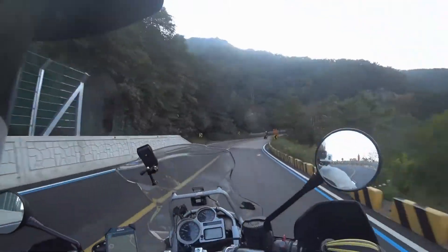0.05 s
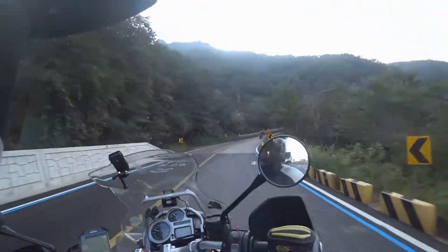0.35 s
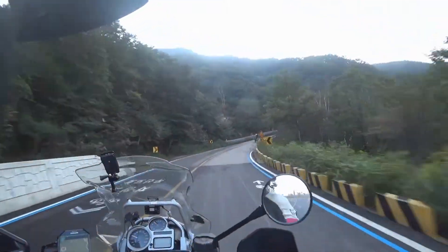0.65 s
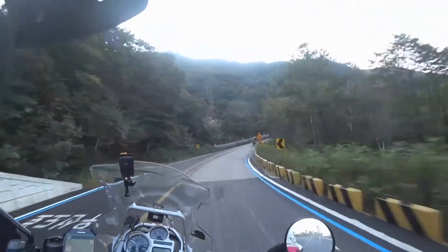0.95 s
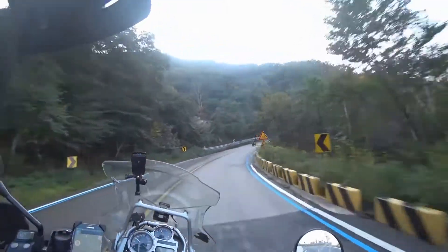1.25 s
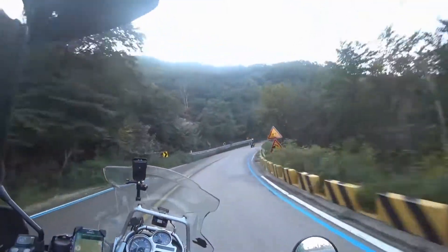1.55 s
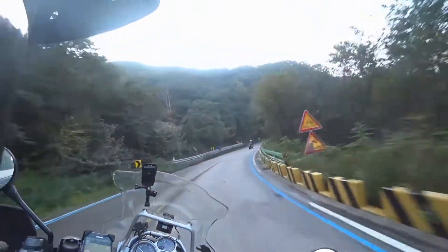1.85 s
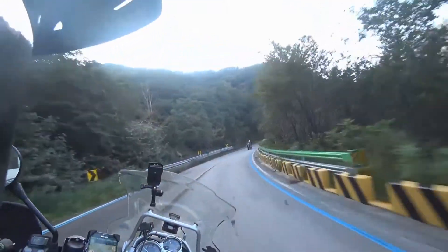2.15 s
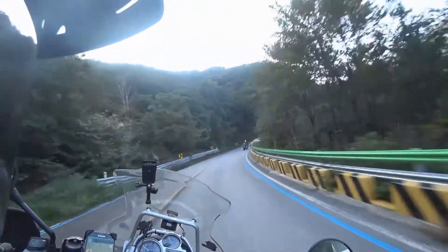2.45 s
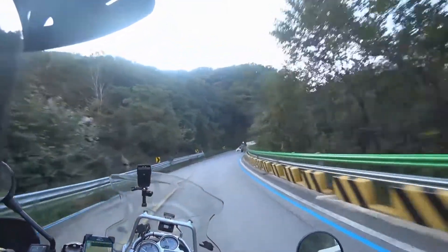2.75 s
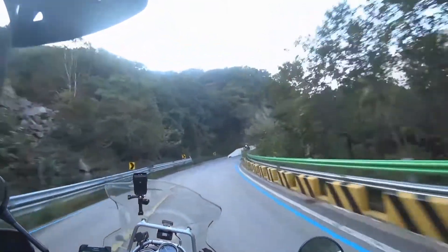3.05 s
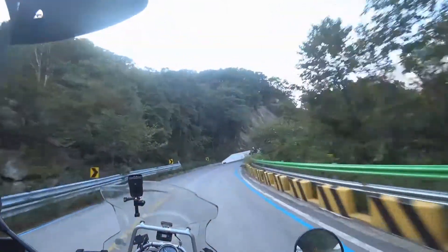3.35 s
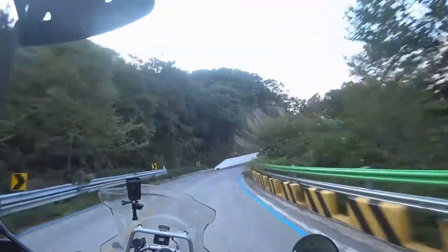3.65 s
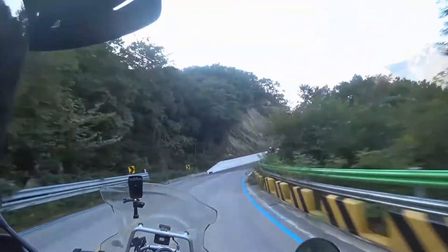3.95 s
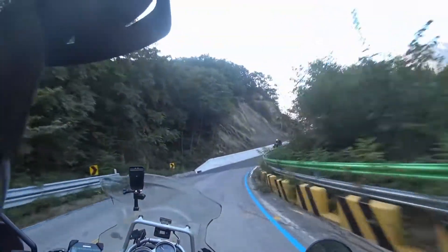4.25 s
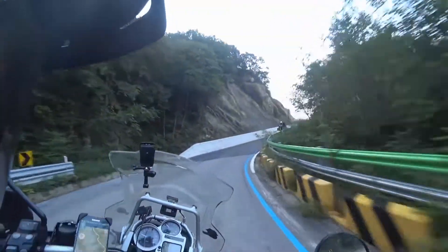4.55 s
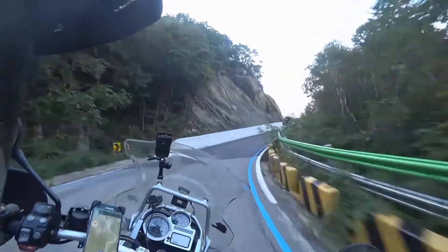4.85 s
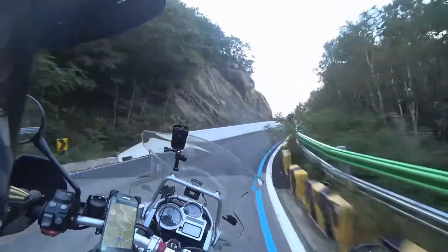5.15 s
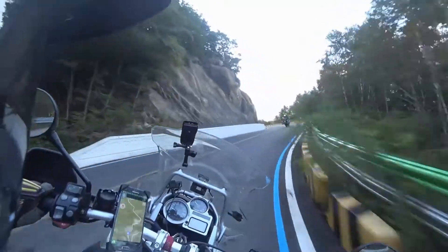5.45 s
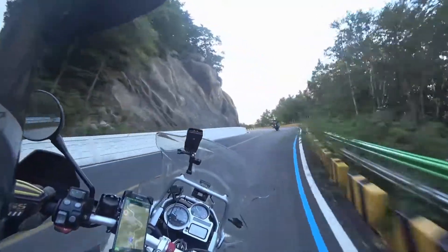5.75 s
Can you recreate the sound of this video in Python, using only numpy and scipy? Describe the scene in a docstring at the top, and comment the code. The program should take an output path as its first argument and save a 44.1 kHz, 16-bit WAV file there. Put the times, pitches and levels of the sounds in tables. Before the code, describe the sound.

Wind buffets a rider's helmet while a motorcycle coasts with a popping exhaust, gives one quick rev, then drones gently faster.

```python
"""A burbling, popping exhaust under buffeting wind: a twin-cylinder motorcycle on a mountain road,
heard close, from a microphone at the rider's helmet. It coasts, brakes in short squeezes and blips the
throttle for a downshift, then pulls away in a steady drone as its firings ring the airbox and pipes.
Valve gear rustles in step with the engine, the slack chain rattles and air hisses round the helmet."""
import sys
import numpy as np
from scipy import signal
from scipy.fft import rfft, irfft
from scipy.io import wavfile
from scipy.ndimage import uniform_filter1d, minimum_filter1d

SR = 44100
rng = np.random.default_rng(int(sys.argv[2]) if len(sys.argv) > 2 else 0)


def bounce(signal):
    """Save signal as a 16-bit WAV file at the path given by the first command-line argument."""
    frames = np.transpose(np.atleast_2d(signal))
    limited = np.clip(frames, -1, 1)
    pcm = np.round(limited * 32767).astype(np.int16)
    wavfile.write(sys.argv[1], SR, pcm)


N = 256662
TIME = np.arange(N) / SR
FREQS = np.maximum(np.arange(N // 2 + 1) * SR / N, 1)


# the silencer from the saddle, throttle shut: f/Hz, relative level/dB
SILENCER_COLOUR = [(25, -33.5), (55, -8), (100, 2), (130, 0.5), (158, -4.5), (182, -13), (205, 1.5),
                   (250, -4), (290, -9.5), (350, -12), (410, -13.5), (470, -20), (600, -41.5), (1000, -49)]
# airbox and pipe resonances, throttle open: f/Hz, width/Hz, relative level/dB
PIPE_MODES = [(109, 55, -5), (166.2, 29, 1), (203, 4.7, -11.5), (259, 6.4, -17), (301.7, 33, -13),
              (359.3, 67.5, -10.5), (405, 7.3, -35), (466, 46, -22)]
# thin overtones under load: f/Hz, width/Hz, relative level/dB
OVERTONE_MODES = [(690, 41, 1.5), (1015, 61, 1.5), (1260, 68, -2), (1397, 80, -0.5), (1806, 110, -2)]

def exhaust(phase, throttle, over_hz):
    """Firings ring the pipes: ragged on a shut throttle, firm and with a thin whine under load."""
    coast_db, pull_db = -20.5 - 0.05 * over_hz, -17 + 0.31 * over_hz
    level_db = (1 - throttle) * coast_db + throttle * pull_db
    ragged = firings(phase + .003 * walk(25)) * undb(1.3 * walk(30))
    firm = firings(phase + .0015 * walk(25)) * undb(.4 * walk(30))
    coast = unit(ring_through(ragged, colour(SILENCER_COLOUR)))
    rolloff = colour([(560, 2.5), (800, -5), (1600, -27)])
    drone = unit(ring_through(firm, resonances(PIPE_MODES) * rolloff))
    first_cylinder = firings(phase + .002 * walk(20))
    second_cylinder = undb(-10) * firings(phase - 3 / 8 + .002 * walk(20))  # 3/8 of a cycle later
    whine = unit(ring_through(first_cylinder + second_cylinder, resonances(OVERTONE_MODES)))
    # harder firings are sharper, so the overtones grow faster than the drone
    whine *= undb(-24 + 3.1 * (level_db + 15)) * throttle
    pull = (drone + whine) * undb(1)
    return (np.sqrt(1 - throttle) * coast + np.sqrt(throttle) * pull) * undb(level_db)


def firings(phase, harmonics=36):
    """One rounded pressure pulse in each engine cycle, made of equal harmonics."""
    from_firing = (phase + .5) % 1 - .5
    return (harmonics + .5) * np.sinc((2 * harmonics + 1) * from_firing) / np.sinc(from_firing) - .5


# pops from the tailpipe, behind the rider: t/s, relative level/dB, ring f/Hz
OVERRUN_POPS = [(0.271, -8, 263), (0.383, 1, 224), (0.433, 5, 219), (0.516, 0, 260), (0.6, -1, 237),
                (0.959, 0.5, 227), (1.536, 0, 248), (1.616, -2, 256), (1.632, -3, 248), (1.781, 8, 228),
                (1.798, -9, 235), (2.274, -16, 240), (3.124, 1.5, 227)]

def pops():
    """Stray firings bang in the silencer on the overrun."""
    return sum(bang(s, db, hz, t60_s=0.039) for s, db, hz in OVERRUN_POPS)


def blip(phase, start_s=1.078, count=5):
    """A twist of the throttle for the downshift: one hard firing in each of a few engine cycles."""
    start_phase = np.interp(start_s, TIME, phase)
    times = np.interp(start_phase + np.arange(count), phase, TIME)
    levels_db = 8.5 + 0.5 * np.linspace(-1, 1, count) ** 2
    return sum(bang(s, db, hz=310, t60_s=.016) for s, db in zip(times, levels_db))


def bang(s, db, hz, t60_s, rise_s=0.0042):
    """One hard firing rings the silencer for a few cycles."""
    out, start = np.zeros(N), int(s * SR)
    t = TIME[:min(SR // 8, N - start)]
    ring = np.sin(2 * np.pi * hz * t) * np.exp(-np.log(1000) * t / t60_s)
    out[start:start + len(t)] = undb(db) * ring * (1 - np.exp(-t / rise_s))
    return out


# valve gear, below the rider: f/Hz, relative level/dB
VALVE_COLOUR = [(300, -2), (700, -0.5), (1000, 4), (1350, 4.5), (1800, -0.5), (2450, -4), (3000, -5.5),
                (3400, -6.5), (3850, -3), (4500, -11.5), (5000, -9), (5700, -32), (9000, -23.5),
                (14000, -35)]
# resonances of the engine cases: f/Hz, width/Hz, relative level/dB
CASE_MODES = [(1213, 160, 1.5), (3055, 350, 1), (3830, 580, -3), (7340, 320, -9.5)]

def machinery(phase, throttle, over_hz):
    """Valve gear rustles in step with the crank; under load the cases ring more and the intake rasps."""
    level_db = -43 + 0.26 * over_hz + 0.4 * throttle
    ring_db = 1 + 0.4 * over_hz * throttle - 5.9 * (1 - throttle)
    beat = 1 + 0.13 * np.cos(2 * np.pi * phase) + 0.067 * np.cos(4 * np.pi * phase)
    rustle = noise(colour(VALVE_COLOUR)) * beat * undb(1.5 * walk(36))
    ring = noise(resonances(CASE_MODES)) * beat * undb(ring_db)
    intake = noise(colour([(500, -50), (950, -8), (1350, 12.5), (1800, 5), (2400, -21)]))
    rasp = intake * (1 + 0.06 * np.cos(8 * np.pi * phase))  # four valve events a cycle chop the air
    return undb(level_db) * (undb(2) * rustle + undb(-2.5) * ring + undb(-4) * throttle * rasp)


# bursts of chatter down by the back wheel: t/s, length/s, level/dB
CHAIN_RATTLES = [(1.125, 0.0056, -33.5), (1.26, .35, -41.5), (1.88, 0.574, -42.5)]
# chain on its guide: f/Hz, relative level/dB
CHAIN_COLOUR = [(300, 0), (1200, 3), (2200, -2), (3000, 1), (3900, -1), (4900, -8), (6000, -13),
                (9500, -12), (11500, -20), (15000, -27)]

def chain(flicker_db=1.6):
    """The slack chain chatters against its guide while the wheel drives the engine."""
    bursts = swells(CHAIN_RATTLES, rise_share=0.047, release_s=0.0073)
    return noise(colour(CHAIN_COLOUR)) * bursts * undb(flicker_db * walk(40))


# braking before the bend, faint at the helmet: t/s, length/s, level/dB
SQUEEZES = [(.52, .1, -56), (.68, .1, -60), (1.67, .07, -58), (2.2, 0.055, -62), (2.52, .6, -56)]
# resonances of pad on disc: f/Hz, width/Hz, relative level/dB
PAD_MODES = [(11700, 450, -3), (12400, 650, 0), (14700, 900, -15)]

def brakes(flicker_db=1.8):
    """The pads sizzle thinly as they drag on the turning discs."""
    pressure = swells(SQUEEZES, rise_share=0.55, release_s=.07)
    return noise(resonances(PAD_MODES)) * pressure * undb(flicker_db * walk(35))


# buffeting right on the microphone: t/s, relative level/dB
BUFFET_LEVELS = [(0.0, -19.5), (1.02, -20.5), (2.9, -20), (3.05, -21), (5.82, -26)]
# its rumble: f/Hz, relative level/dB
RUMBLE_COLOUR = [(2, -34), (10, 12), (25, -9), (55, -0.5), (90, -4), (150, -7), (250, -10), (360, -19.5),
                 (480, -21.5), (700, -35), (1500, -71)]
# gusts round the helmet: t/s, length/s, level/dB
HELMET_GUSTS = [(.03, 0.27, -29.5), (.55, 0.55, -32.5), (1.22, 0.1, -29), (2.5, 0.64, -28)]
# their flutter: f/Hz, relative level/dB
GUST_COLOUR = [(2, -22), (100, 17), (250, -6), (400, 12), (550, 4.5), (750, -0.5), (1100, -8), (1800, -14),
               (3000, -37), (6000, -37.5)]
# air at the helmet's edges, close to the microphone: t/s, relative level/dB
HISS_LEVELS = [(0.05, -49.5), (0.37, -51.5), (1.22, -52.5), (1.3, -51), (2.48, -53.5), (3.06, -48),
               (3.51, -51), (4.42, -47), (5.8, -46)]
# its hiss: f/Hz, relative level/dB
HISS_COLOUR = [(1000, -6.5), (4800, 2), (5800, -3), (7300, 1), (8000, -1), (8800, 1), (10400, 0),
               (11100, -6), (12000, -6.5), (13000, -11), (15300, -21)]

def wind(over_hz):
    """Eddies thump the microphone, flutter round the helmet and hiss at its edges."""
    buffet_db, = curves(BUFFET_LEVELS)
    hiss_db, = curves(HISS_LEVELS)
    between_gusts = undb(-37.5 + 0.14 * over_hz)
    gusts = np.hypot(between_gusts, swells(HELMET_GUSTS, rise_share=0.51, release_s=0.09))
    eddies = walk(28)
    buffet = steady(noise(colour(RUMBLE_COLOUR)), seconds=.05) * undb(buffet_db + 3)
    flutter = unit(noise(colour(GUST_COLOUR)) * undb(1.7 * eddies)) * gusts
    hiss = noise(colour(HISS_COLOUR)) * undb(hiss_db + 2 + eddies)
    return buffet + flutter + hiss


# eddies striking the microphone itself: t/s, relative level/dB
EDDY_SLAPS = [(1.096, -16), (1.597, -14), (1.782, -11), (2.871, -19), (3.083, -26), (3.098, -15.5),
              (4.306, -47)]

def slaps(decay_s=0.0042, gain_db=-4):
    """Single strong eddies break on the microphone with a dull tap."""
    push = np.zeros(N)
    for s, db in EDDY_SLAPS:
        start = int(s * SR)
        push[start:] += undb(db + gain_db) * np.exp(-TIME[:N - start] / decay_s)
    dull = colour([(2, -34), (80, -22), (300, 15), (750, 2.5), (1100, -5), (2500, -62), (6000, -85)])
    return ring_through(push * rng.standard_normal(N), dull) / np.sqrt(np.mean(dull ** 2))


def undb(db):
    """Decibels to gain."""
    return 10 ** (np.asarray(db) / 20)


def unit(x):
    """Scale to rms 1."""
    return x / np.sqrt(np.mean(x ** 2))


def curves(table):
    """Each column of a time table, sample by sample."""
    s, *columns = np.transpose(table)
    return [np.interp(TIME, s, c) for c in columns]


def swells(table, rise_share, release_s):
    """Gain of swells (t/s, length/s, level/dB): each builds, holds, then lets go."""
    out = np.zeros(N)
    for s, length, db in table:
        rise = np.clip((TIME - s) / (rise_share * length), 0, 1)
        fall = np.clip(1 - (TIME - s - length) / release_s, 0, 1)
        out += undb(db) * rise * fall
    return out


def colour(points):
    """Gain at every frequency from points (f/Hz, level/dB)."""
    hz, db = np.transpose(points)
    return undb(np.interp(np.log(FREQS), np.log(hz), db))


def resonances(modes):
    """Gain at every frequency from peaks (f/Hz, width/Hz, level/dB)."""
    return sum(undb(db) / (1 + ((FREQS - hz) / (width / 2)) ** 2) for hz, width, db in modes)


def ring_through(x, gain):
    """Pass x through a body that has this gain and rings after each push (minimum phase)."""
    cepstrum = irfft(np.log(gain + 1e-4), N)
    cepstrum[1:N // 2] *= 2
    cepstrum[N // 2 + 1:] = 0
    return irfft(rfft(x) * np.exp(rfft(cepstrum)), N)


def noise(gain):
    """Noise of rms 1 with the given spectrum."""
    return unit(irfft(rfft(rng.standard_normal(N)) * gain, N))


def walk(hz):
    """Smooth random drift of rms 1 that moves up to about hz times a second."""
    return noise(1 / (1 + (FREQS / hz) ** 4))


def steady(x, seconds):
    """Take the slow swells out of a noise, leaving its quick ones."""
    size = max(int(seconds * SR), 2)
    power = uniform_filter1d(uniform_filter1d(x ** 2, size), size)
    return x / np.sqrt(power + 1e-9)


# engine speed into the bend and out again: t/s, four-stroke cycle f/Hz
ENGINE_SPEED = [(0.1, 62.35), (0.53, 58.95), (0.59, 59.28), (1.04, 53.83), (1.16, 62.62), (1.25, 62.75),
                (1.38, 66.97), (1.47, 64.38), (1.82, 60.49), (2.56, 51.05), (2.92, 49.41), (3.28, 49.27),
                (3.43, 53.25), (3.54, 49.34), (3.58, 50.03), (4.58, 53.4), (4.8, 53.8), (5.76, 59.54)]
CRUISE_HZ = 55
OPEN_AT_S, OPEN_TAKES_S = 3.01, 0.32  # the throttle is rolled open

def scene():
    """Engine, chain, brakes and wind meet at one microphone on the helmet."""
    cycle_hz, = curves(ENGINE_SPEED)
    over_hz = cycle_hz - CRUISE_HZ  # levels follow the speed above cruising
    phase = np.cumsum(cycle_hz) / SR  # in engine cycles
    throttle = np.clip((TIME - OPEN_AT_S) / OPEN_TAKES_S, 0, 1)
    tailpipe = exhaust(phase, throttle, over_hz) + pops() + blip(phase)
    motorcycle = tailpipe + machinery(phase, throttle, over_hz) + chain() + brakes()
    return (motorcycle + wind(over_hz) + slaps())[None]


def record(dry):
    """A limiter after the microphone holds the peaks down; the highest treble is cut."""
    window, ceiling, top_hz = SR // 100, .58, 15450
    allowed_gain = np.minimum(1, ceiling / (np.abs(dry) + 1e-9))
    gain = uniform_filter1d(minimum_filter1d(allowed_gain, window), window)
    lowpass = signal.ellip(10, .2, 80, top_hz, fs=SR, output="sos")
    return signal.sosfilt(lowpass, dry * gain)


dry = scene()
out = record(dry)
bounce(out)
```